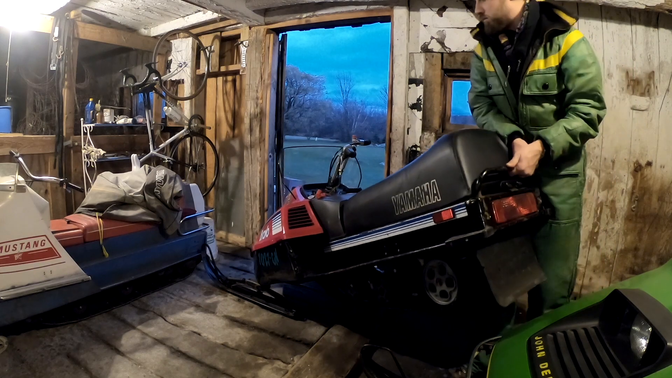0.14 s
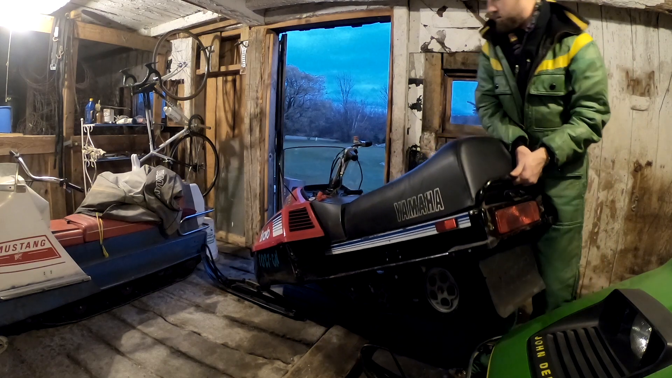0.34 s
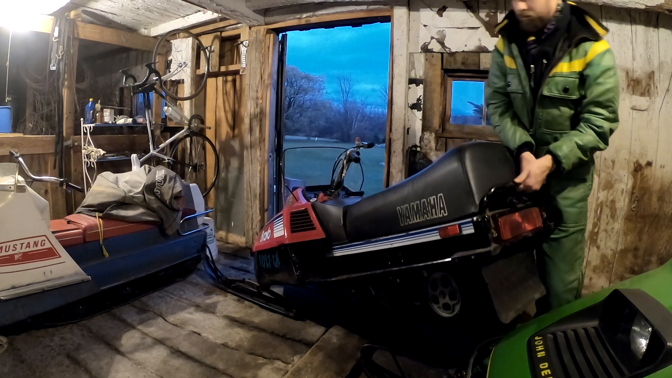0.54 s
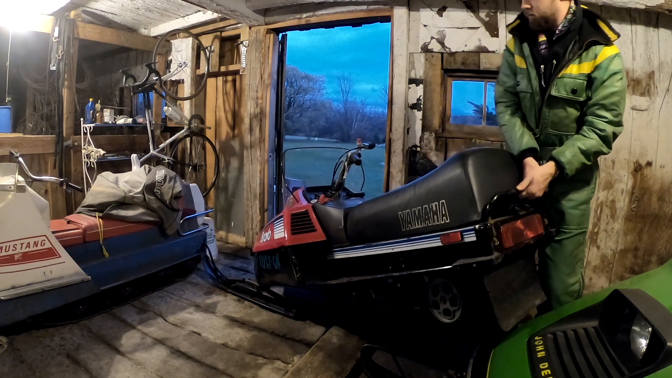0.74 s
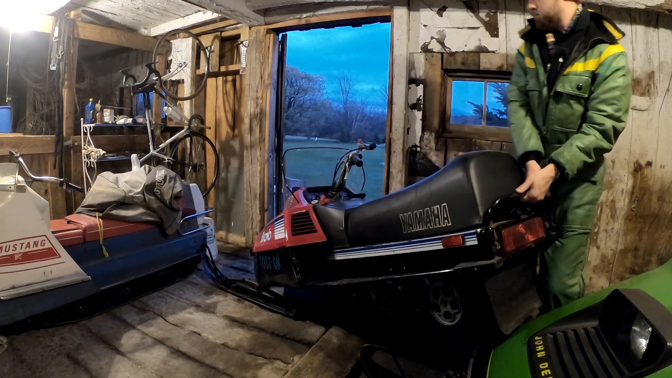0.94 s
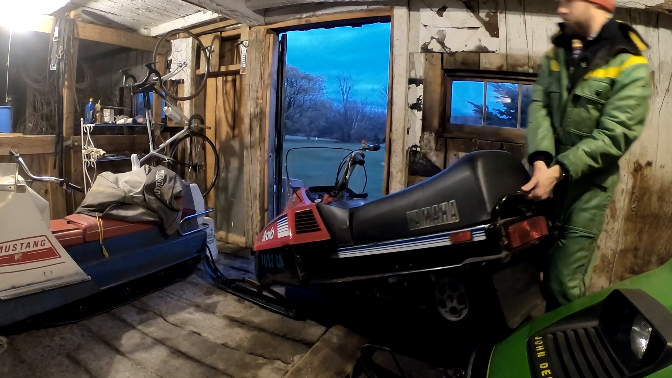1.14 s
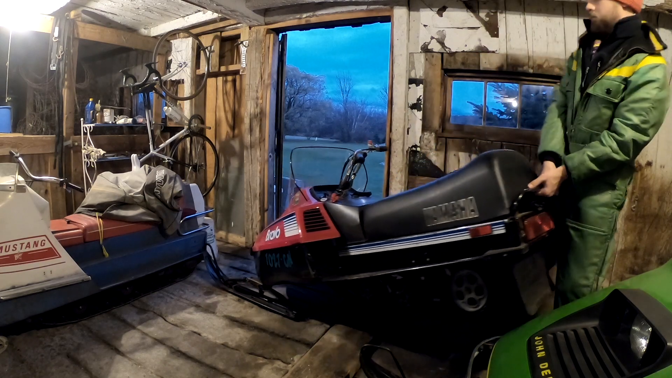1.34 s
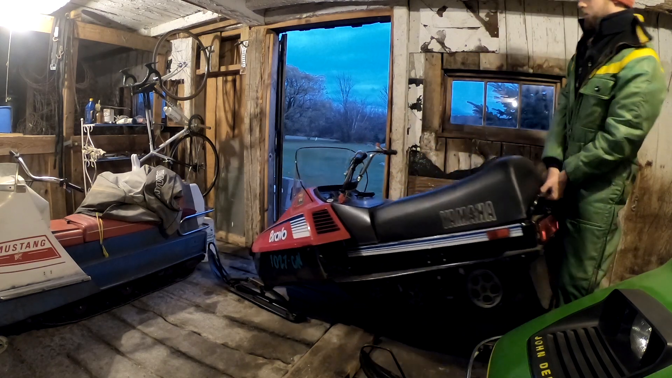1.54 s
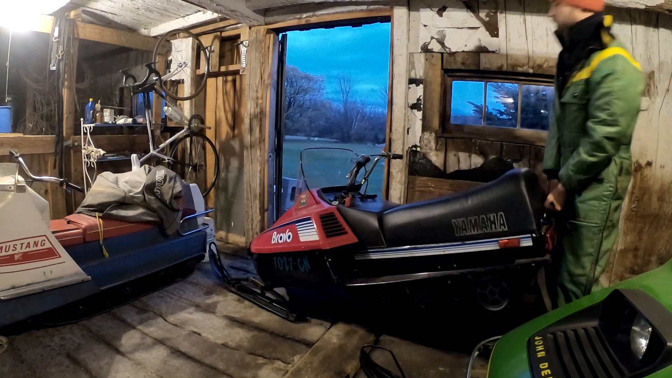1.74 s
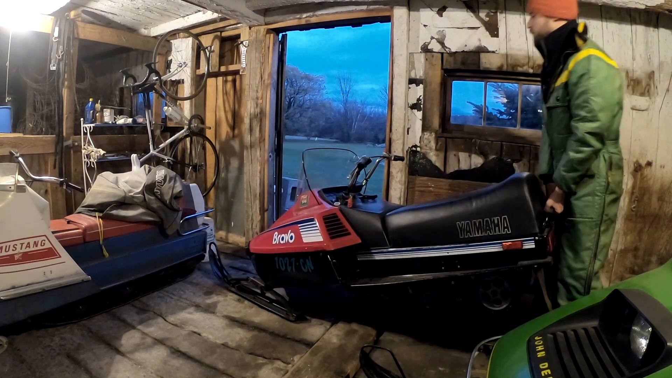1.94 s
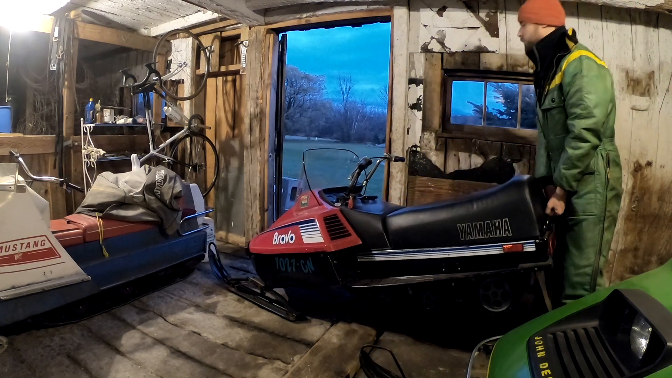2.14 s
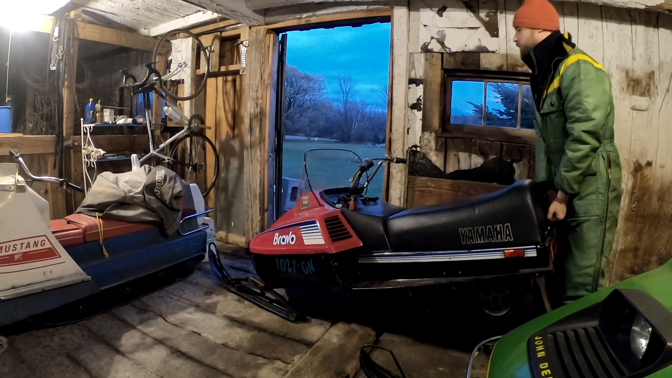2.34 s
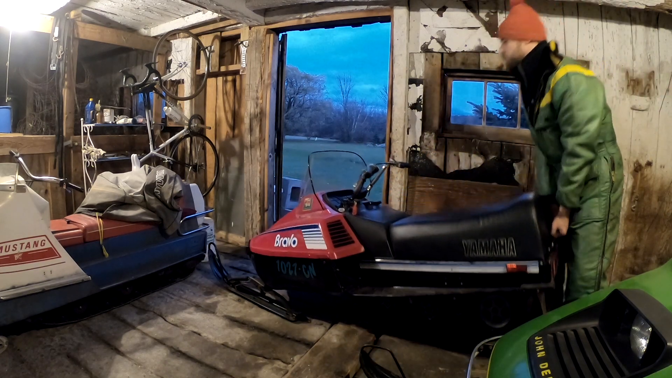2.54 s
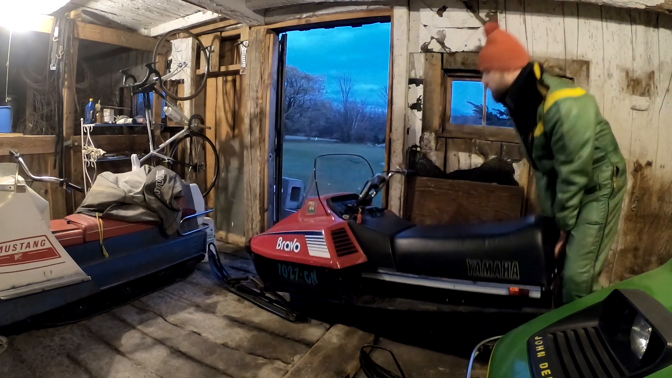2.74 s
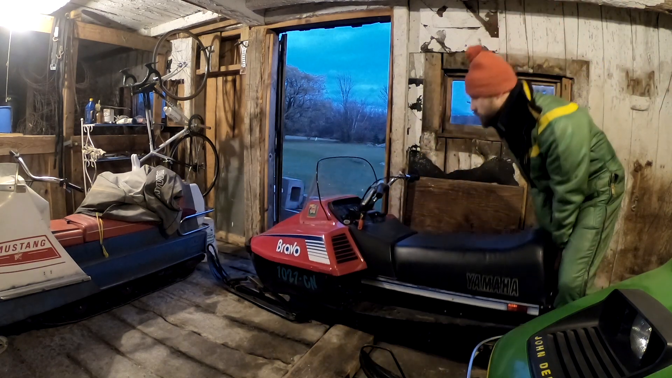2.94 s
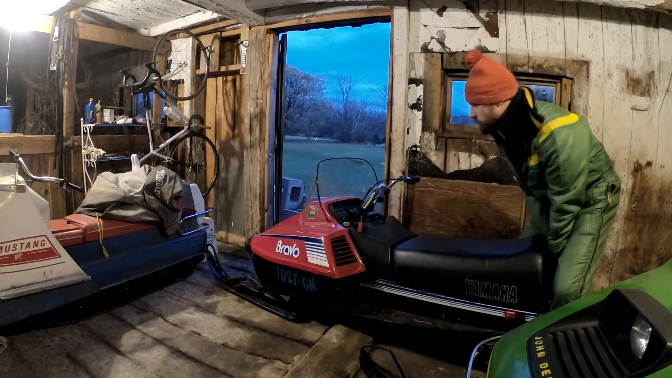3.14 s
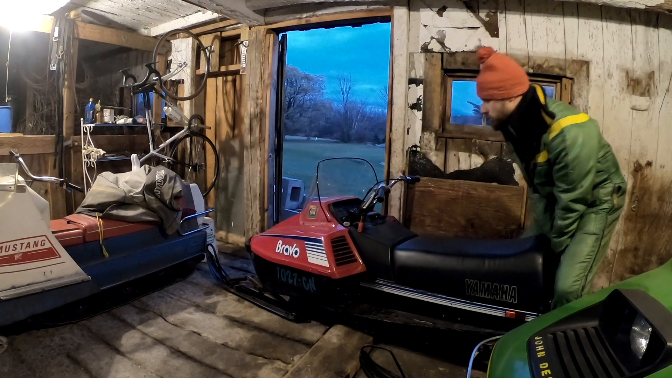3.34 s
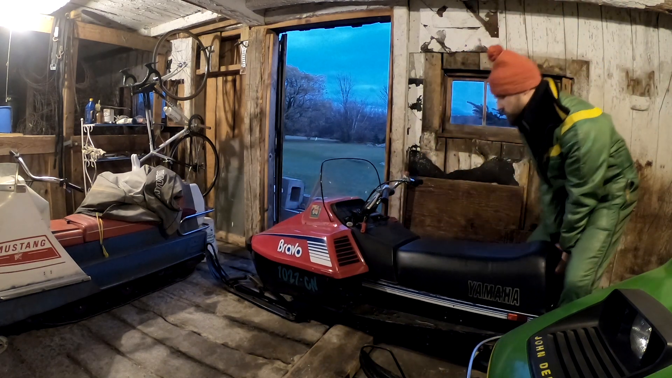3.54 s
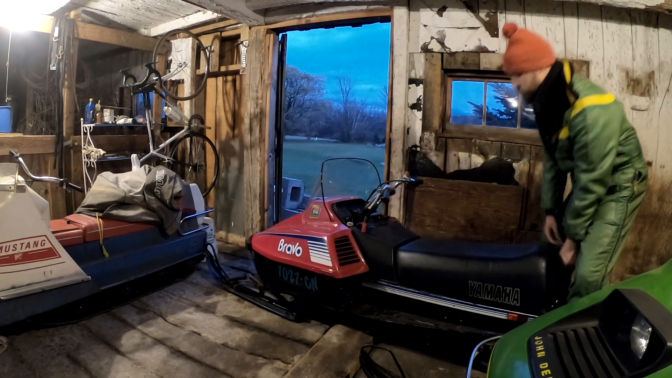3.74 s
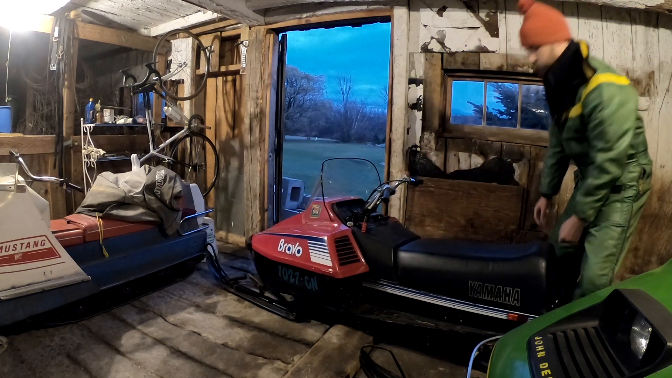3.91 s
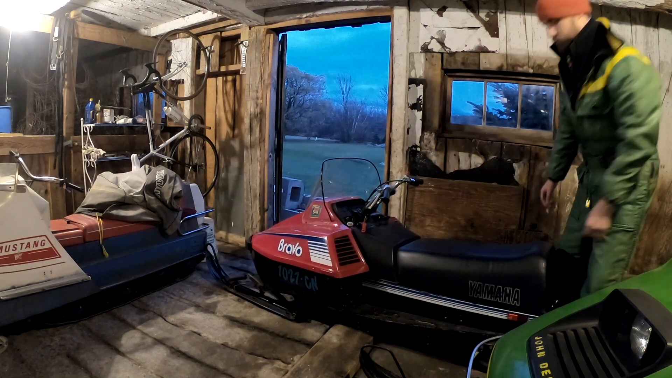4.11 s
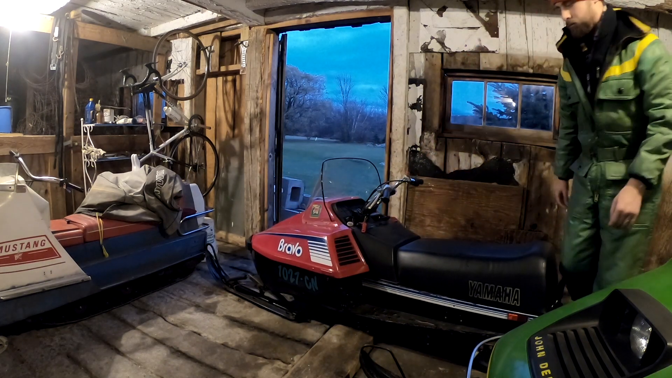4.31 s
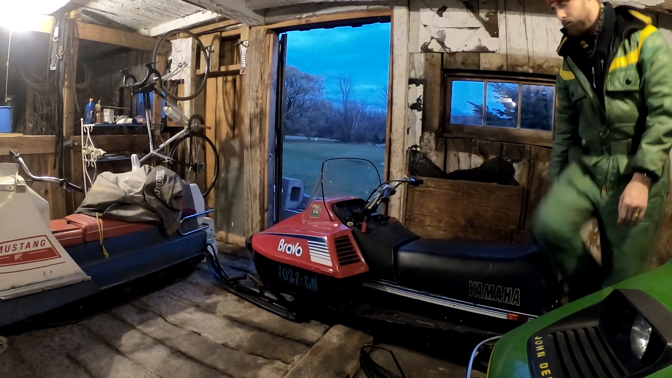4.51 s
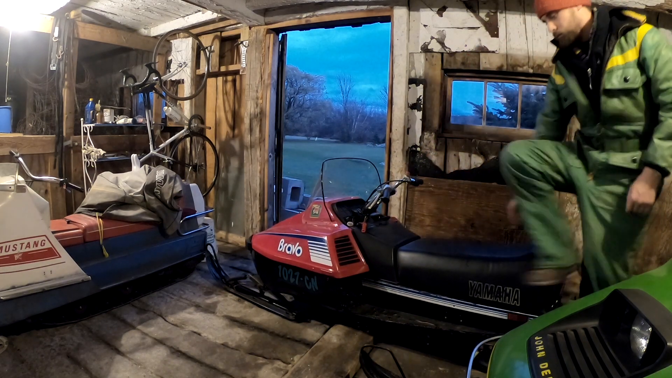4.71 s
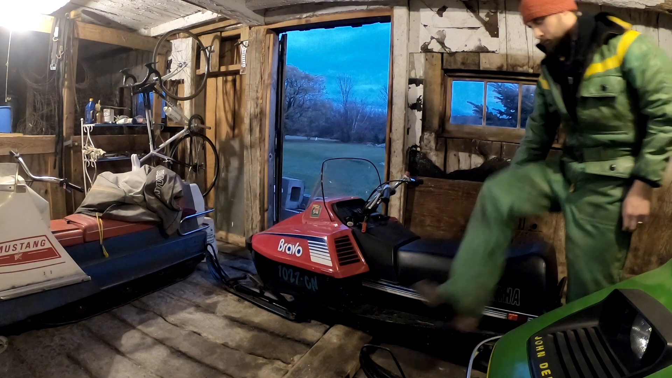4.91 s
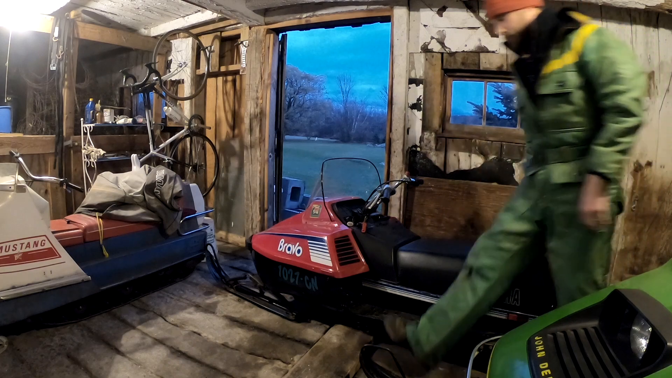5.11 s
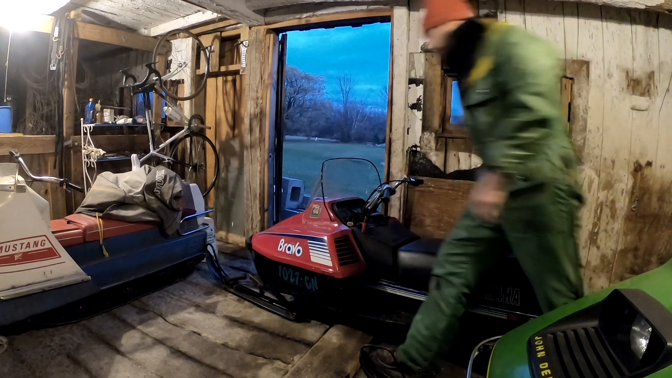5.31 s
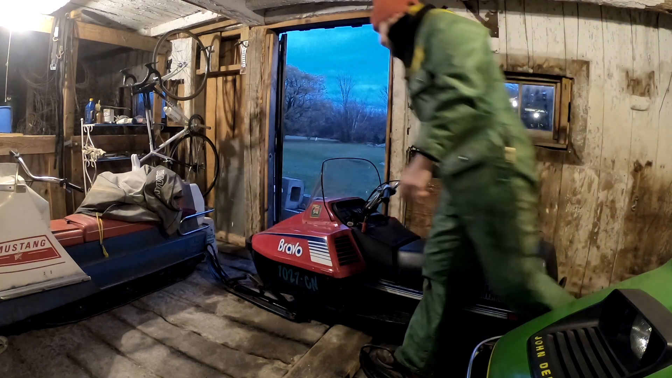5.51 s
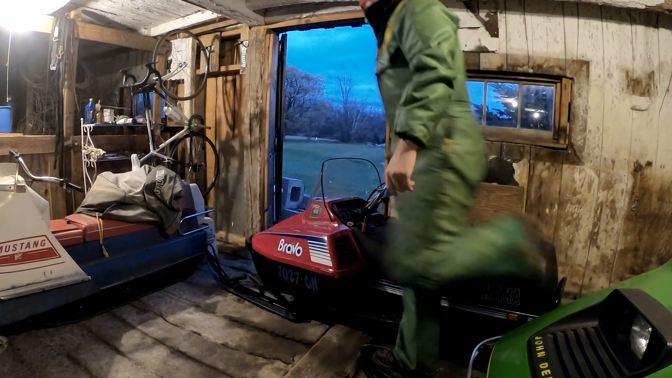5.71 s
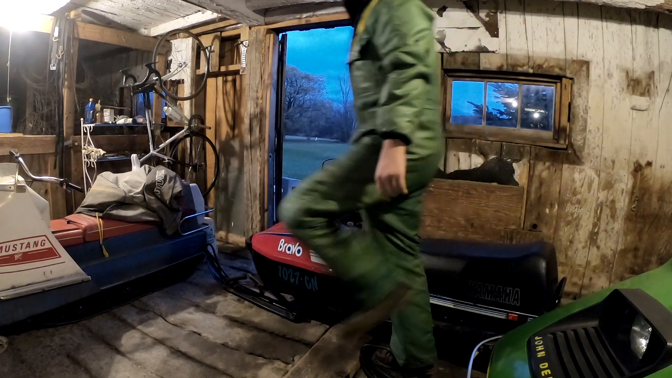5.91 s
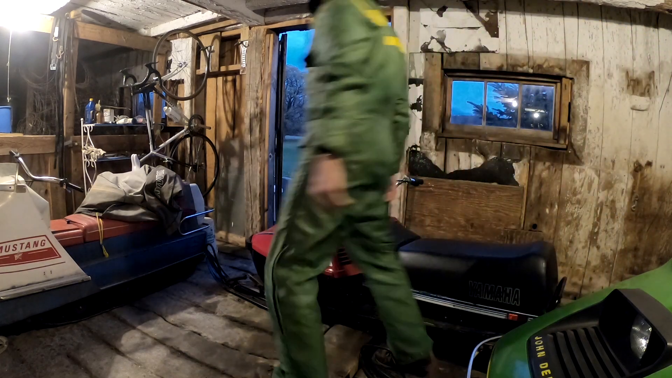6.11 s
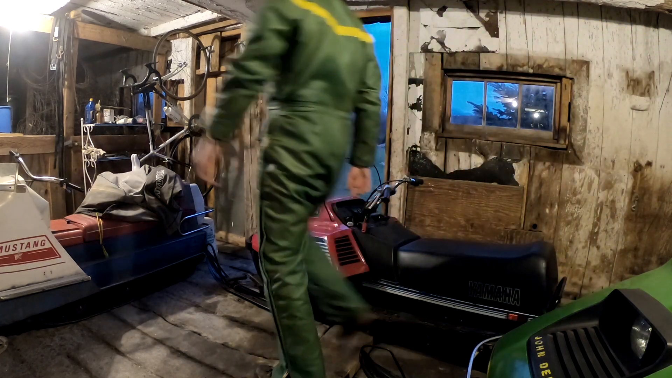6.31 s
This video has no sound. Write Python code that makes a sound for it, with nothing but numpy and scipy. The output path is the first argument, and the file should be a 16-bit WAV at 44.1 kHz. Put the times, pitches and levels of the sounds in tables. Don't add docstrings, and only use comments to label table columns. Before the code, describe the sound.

A heavy snowmobile scrapes and groans across wooden barn floorboards with knocks and squeaks, drops, then boots step, slap sharply, and land a deep thump.

```python
import sys
import numpy as np
from scipy import signal
from scipy.fft import rfft, irfft, next_fast_len
from scipy.io import wavfile

SR = 44100
rng = np.random.default_rng(int(sys.argv[2]) if len(sys.argv) > 2 else 0)


def dump(signal):
    limited = np.clip(np.atleast_2d(signal).T, -1, 1)
    pcm = np.round(limited * 32767).astype(np.int16)
    wavfile.write(sys.argv[1], SR, pcm)


def volts_from_decibels(level):
    exponent = np.asarray(level, float) / 20
    return 10 ** exponent


N = 284886

# hz, width_hz, level_db
BOARD_MODES = [(156, 18.5, -11), (182.4, 6.7, 2), (229.7, 23.7, 0.5), (269.4, 62, 1), (297.6, 46, 0.5),
               (350, 46, -6), (406, 26, -5), (485, 89, -13)]
# time_s, level_db
SLED_WEIGHT = [(0.0, -43), (0.2, -46), (0.4, -55), (0.9, -64), (1.04, -52), (1.22, -52), (1.3, -39),
               (1.66, -31), (1.9, -53), (2.0, -44), (2.34, -63), (2.97, -47), (3.12, -37), (3.26, -49),
               (3.41, -57), (3.56, -41), (4.0, -55), (4.22, -82)]
# peak_s, level_db, rise_s per 20 dB, fall_s per 20 dB
SHOVE_SWELLS = [(0.005, -42, .05, .07), (0.16, -48, .09, .2), (1.35, -36, .09, .3), (1.53, -32, .13, .12),
                (1.7, -35, .15, .2), (1.9, -62, .1, .35), (3.12, -39, .085, .13), (3.67, -46, .07, .16),
                (5.27, -55, .08, .12)]


def band(x, low_hz, high_hz):
    return signal.sosfilt(signal.butter(2, [low_hz, min(high_hz, SR / 2 - 2000)], "band", fs=SR, output="sos"), x)


def low_pass(x, cut_hz, order=2):
    return signal.sosfilt(signal.butter(order, cut_hz, fs=SR, output="sos"), x)


def high_pass(x, cut_hz, order=2):
    return signal.sosfilt(signal.butter(order, cut_hz, "high", fs=SR, output="sos"), x)


def rms_one(x):
    return x / np.sqrt(np.mean(x ** 2) + 1e-20)


def panned(pan_db):
    return volts_from_decibels(np.multiply.outer([.5, -.5], pan_db))


def place_db(s):
    # time_s, knock_pan_db, scuff_pan_db
    path = [(0.3, 1.5, -5.5), (1.3, 1.2, -1.5), (3.1, 3, 0.4), (3.3, 1.3, -4), (4.75, 5, -7),
            (5.2, 6, -1.5), (5.6, 1.2, -5), (6.2, 0.3, 0.8)]
    at_s, knock_db, scuff_db = np.transpose(path)
    return np.interp(s, at_s, knock_db), np.interp(s, at_s, scuff_db)


def curve(rows):
    return np.interp(np.arange(N) / SR, *np.transpose(rows))


def swells(rows):
    t = np.arange(0, N + 32, 32) / SR
    power = 0
    for peak_s, level_db, rise_s, fall_s in rows:
        below = np.maximum((peak_s - t) / rise_s, (t - peak_s) / fall_s)
        power = power + volts_from_decibels(2 * level_db - 40 * below)
    return np.interp(np.arange(N) / SR, t, np.sqrt(power))


def slips(per_s, uneven_db, alike, clump_db):
    sizes = volts_from_decibels(uneven_db * np.minimum(rng.exponential(1, (2, N)), 4)) * rng.standard_normal((2, N))
    knots = np.arange(0, N, 500)
    clumps = np.interp(np.arange(N), knots, rng.standard_normal(len(knots)))
    happens = rng.random((2, N)) < per_s / SR
    mid, side = rms_one(sizes * volts_from_decibels(clump_db * clumps) * happens)
    alike = np.clip(alike, 0, 1)
    return (np.sqrt(1 + alike) * mid + np.sqrt(1 - alike) * side * np.array([[1], [-1]])) / np.sqrt(2)


def body(drive, modes):
    out, power = 0, 0
    for k, (hz, width_hz, level_db) in enumerate(modes):
        r = np.exp(-np.pi * width_hz / SR)
        b = np.array([1, 0, -1]) * (1 - r * r) / 2
        a = [1, -2 * r * np.cos(2 * np.pi * hz / SR), r * r]
        out = out + (-1) ** k * volts_from_decibels(level_db) * signal.lfilter(b, a, drive + 1e-18)
        power += volts_from_decibels(2 * level_db) * np.pi * width_hz / SR
    return out / np.sqrt(power)


def blow(s, contact_ms, modes, gains):
    t = np.arange(min(SR // 2, N - round(s * SR))) / SR
    hz, level, t60_s = np.transpose(modes)
    level = level * (-1) ** np.arange(len(hz))
    rings = level[:, None] * np.sin(2 * np.pi * np.outer(hz, t)) * volts_from_decibels(-60 * t / t60_s[:, None])
    push = np.hanning(max(round(contact_ms * SR / 1000), 5))
    sound = signal.fftconvolve(gains @ rings, push[None])[:, :len(t)]
    return round(s * SR), sound / np.abs(sound.mean(axis=0)).max()


def board_force():
    # peak_s, level_db, rise_s per 20 dB, fall_s per 20 dB
    treads = [
        (2.375, -45.5, .03, .7),
        (3.6, -27, .05, .18),
        (4.57, -50, .13, .36),
        (4.78, -34, .04, .05),
        (5.21, -41, .03, .3),
        (5.27, -35, .08, .12),
        (5.59, -46, .03, .5),
        (5.92, -61, .5, 3.0),
    ]
    shoves = volts_from_decibels(-1.5) * swells(SHOVE_SWELLS)
    return np.sqrt(volts_from_decibels(2 * curve(SLED_WEIGHT)) + swells(treads) ** 2 + shoves ** 2)


def rubbing_force():
    # time_s, level_db
    slide = [(0.0, -60), (0.08, -50), (0.22, -63), (0.92, -63), (1.24, -53), (1.3, -47.5), (1.7, -50),
             (1.89, -55), (2.08, -66), (2.21, -86), (2.57, -58), (2.74, -56), (3.17, -56), (3.38, -94),
             (3.59, -48), (3.69, -60), (3.77, -57.5), (3.91, -82)]
    # time_s, level_db
    stride = [(3.95, -82), (4.22, -67), (4.44, -62.5), (4.57, -52.5), (4.73, -56), (4.78, -51), (4.92, -60),
              (5.04, -67), (5.17, -65), (5.21, -49), (5.28, -46), (5.47, -65), (5.92, -65)]
    mean_db = -58
    ski_db = curve(slide + [(4.1, -120)])
    suit_db = curve([(3.8, -120)] + stride)
    ski_hull = volts_from_decibels(-57.5 + 1.1 * (ski_db - mean_db))
    suit_hull = (suit_db > -90) * volts_from_decibels(-61 + .7 * (suit_db - mean_db))
    return ski_hull + suit_hull, volts_from_decibels(ski_db) + volts_from_decibels(suit_db)


def scuff_force():
    # start_s, grit_db, hull_db, rise_ms, t60_s
    scuffs = [(0.057, -29.5, -41, 2, 0.13), (0.088, -56, -38, 7, 0.21), (0.176, -39, -48, 3, 0.1),
              (0.9896, -41.5, -54.5, 4, 0.2), (1.31, -41, -45, 8, 0.3), (1.326, -44, -35.5, 5, .3),
              (1.372, -43, -37, 4, 0.12), (1.443, -47, -48, 4, 0.14), (1.475, -40, -52, 6, .15),
              (1.54, -46, -44, 5, .15), (1.59, -36, -38, 8, 0.2), (1.611, -24, -36, 4, 0.1),
              (1.64, -38, -39, 12, .45), (1.8942, -40.5, -53.5, 4, 0.31), (2.991, -46.5, -42, 8, 0.15),
              (3.094, -47.5, -50, 8, 0.085), (3.19, -41, -42, 3, 0.15), (3.445, -54, -48, 1.5, 0.4),
              (3.545, -50, -46, 15, .3), (3.578, -42, -33, 8, 0.23), (3.612, -28, -28, 8, 0.17),
              (3.818, -45, -47, 20, 0.39), (4.49, -45, -52.5, 30, 0.43), (4.762, -43.5, -39, 8, 0.17),
              (5.074, -49, -59, 8, 0.48), (5.1966, -5.5, -26.5, 2.5, 0.07), (5.21, -20, -35, 5, .3),
              (5.255, -30.5, -35, 8, 0.2), (5.577, -35.5, -54, 8, 0.31), (5.8696, -52, -60, 10, 0.48),
              (5.94, -38, -45, 20, 0.16), (6.145, -53, -38, 1.5, 0.15), (6.1894, -48, -48, 6, 0.16),
              (6.2344, -52, -49.5, 6, 0.16)]
    hull, grit, t = np.zeros((2, N)), np.zeros((2, N)), np.arange(SR // 2) / SR
    for s, grit_db, hull_db, rise_ms, t60_s in scuffs:
        at, rise_s = round(s * SR), rise_ms / 1000
        shape = (1 - np.exp(-t / max(rise_s, 5e-4))) * volts_from_decibels(-60 * t / max(t60_s, .03))
        shape = np.outer(panned(place_db(s)[1]), shape / shape.max())[:, :N - at]
        hull[:, at:at + len(t)] += volts_from_decibels(hull_db - 3.0) * shape
        grit[:, at:at + len(t)] += volts_from_decibels(grit_db - 7.5) * shape
    return hull, grit


def drag():
    # hz, width_hz, level_db
    joist_modes = [(30.2, 5.1, -21), (58, 22, -5), (84, 9, -1), (113, 7.3, -3)]
    hull_modes = [(663, 100, -2), (804, 135, -2.5), (970, 135, -3), (1159, 46.5, 0.5), (1301, 86, -1.5),
                  (1500, 172, -1.5), (1814, 277, -4)]
    grit_modes = [(1992, 290, -0.5), (2400, 290, 2), (2780, 257, 0.5), (3050, 173, 3), (3440, 630, -2.5),
                  (4170, 340, -2), (4580, 440, -4), (5520, 420, -2), (6200, 540, -2), (7080, 340, -3.5),
                  (7685, 230, -5.5)]
    # peak_s, level_db, rise_s per 20 dB, fall_s per 20 dB
    settle = [
        (6.27, -26, .06, .2),
    ]
    suit_from_s, suit_sheen_db = 4.2, 9
    place = panned(-2.5)[:, None]
    hull_rub, grit_rub = rubbing_force()
    hull_scuff, grit_scuff = scuff_force()

    joist_force = volts_from_decibels(-78) + swells(SHOVE_SWELLS + settle)
    joist_slips = slips(600, uneven_db=3.5, alike=0.2, clump_db=0.5)
    joists = low_pass(body(volts_from_decibels(1.5) * joist_force * joist_slips, joist_modes), 220)

    board_slips = slips(600, uneven_db=1.5, alike=0.85, clump_db=2.0)
    boards = band(body(volts_from_decibels(2.5) * board_force() * place * board_slips, BOARD_MODES), 118, 563)

    hull_force = volts_from_decibels(1.5) * hull_rub * place + hull_scuff
    hull = body(hull_force * slips(1500, uneven_db=1.5, alike=0.4, clump_db=1.5), hull_modes)

    grit_force = volts_from_decibels(5.5) * grit_rub * place + grit_scuff
    grains = grit_force * slips(9000, uneven_db=-1.5, alike=0.52, clump_db=1.0)
    grit = band(body(grains, grit_modes), 1550, 7900)

    suit_gain = volts_from_decibels(suit_sheen_db * (np.arange(N) > suit_from_s * SR))
    fine = grit_force * suit_gain * rng.standard_normal((2, N))
    sheen = volts_from_decibels(-22) * band(fine, 8000, 10400) + volts_from_decibels(-33) * band(fine, 8600, 14000)
    return joists + boards + hull + grit + sheen


def groan():
    # peak_s, level_db, rise_s per 20 dB, fall_s per 20 dB
    groans = [(0.1, -36, .06, .08), (.215, -33, .03, .2), (0.25, -30, .1, .3), (.32, -33, .2, .05),
              (0.49, -51, .08, .15), (1.05, -47, .04, .5), (1.49, -30, .12, .15), (1.69, -25.5, .1, .09),
              (1.86, -42, .2, .07), (1.99, -43, .04, .4), (2.91, -41, .1, .1), (2.42, -41, .05, .3),
              (0.83, -55, .2, .2), (3.48, -40, .13, .2), (3.636, -24, .05, .03), (4.0, -52, .3, .2)]
    # start_s, end_s
    free_spans = [
        (0.0, 3.03),
        (3.28, 4.16),
    ]
    plank_hz, sag_hz_per_db, loaded_db = 157, .7, -38
    t, out = np.arange(N) / SR, 0
    waver = rms_one(low_pass(rng.standard_normal((3, N)), 22))
    force = np.hypot(volts_from_decibels(-8 + curve(SLED_WEIGHT)), swells(groans))
    hz = plank_hz + sag_hz_per_db * np.clip(loaded_db - 20 * np.log10(force), 0, 40)
    phase = 2 * np.pi * np.cumsum(hz * (1 + 0.075 * waver[0])) / SR
    ear_phase = np.outer([1, -1], 0.37 + .15 * waver[2])
    for start_s, end_s in free_spans:
        fade = np.clip(np.minimum(t - start_s + .02, end_s + .02 - t) / .02, 0, 1)
        level = fade * force * volts_from_decibels(2.5 * waver[1] - 2.0) * np.sqrt(2)
        out = out + level * np.sin(phase + ear_phase)
    return band(out, 118, 260) * panned(0.6)[:, None]


def squeaks():
    # start_s, level_db, pitch_hz, length_s
    narrow = [(0.076, -42, 1300, 0.045), (1.364, -33, 1194, 0.025), (1.435, -29.5, 1115, 0.038),
              (1.584, -26.5, 1184, 0.056), (1.646, -32, 1090, 0.078), (3.0, -37, 1220, 0.039),
              (3.092, -34.5, 1330, 0.024), (3.131, -34.5, 1270, 0.033), (3.443, -39, 1940, 0.044),
              (3.585, -25, 420, 0.1), (3.592, -29.5, 790, .1), (3.835, -43.5, 1180, 0.035),
              (4.495, -44.5, 293, 0.24), (4.53, -45, 2950, 0.055), (4.722, -46, 1300, 0.045),
              (4.6, -48, 3500, .045), (4.5, -50, 1450, .05), (5.195, -33.5, 573, 0.083),
              (5.578, -45, 2530, 0.047), (5.592, -47, 770, .07), (5.31, -42, 1750, .06),
              (3.19, -36, 2450, .03), (3.205, -38, 1500, .03), (3.14, -38, 1500, .03),
              (1.33, -36, 1900, .03), (1.37, -38, 2100, .03)]
    # start_s, level_db, pitch_hz, length_s
    broad = [(0.084, -42.5, 2000, 0.08), (1.889, -43, 1330, 0.18), (3.188, -38, 2400, .045),
             (4.266, -53.5, 4460, 0.12), (5.193, -24, 3200, 0.018), (5.583, -37, 6100, 0.037),
             (5.943, -41.5, 5800, 0.039), (6.186, -22, 467, 0.068), (6.19, -42, 1100, 0.068),
             (1.62, -33, 520, .12), (2.995, -35, 450, .06), (3.6, -30, 650, .09), (5.22, -35, 2050, .07),
             (5.335, -43, 6200, .07), (2.995, -46, 2750, .02), (1.612, -34, 3700, .015)]
    out, grain = np.zeros((2, N)), slips(3000, uneven_db=1.0, alike=0.59, clump_db=0.0)
    t = np.arange(SR // 4) / SR
    for rows, width_share in [(narrow, .155), (broad, .48)]:
        for s, peak_db, hz, length_s in rows:
            at, width_hz = round(s * SR), width_share * hz
            shape = (1 - np.exp(-t / .003)) * np.exp(-(t / length_s) ** 3)
            ring = body(shape * grain[:, at:at + len(t)], [(hz, width_hz, 0)])
            ring = body(ring, [(hz, 1.86 * width_hz, 0)])
            held_rms = np.sqrt(np.mean(ring ** 2) * 0.61 / length_s)
            out[:, at:at + len(t)] += volts_from_decibels(peak_db) * ring / held_rms / 2
    return band(out, 60, 8500)


def knocks():
    # start_s, peak_db, pitch_hz, t60_s
    blows = [(0.085, -23.5, 156, 0.066), (0.134, -31.5, 173, 0.07), (0.38, -36, 233, 0.068),
             (1.337, -18, 174, 0.075), (1.373, -18.5, 120, 0.2), (1.459, -24, 156, 0.09),
             (1.484, -21.5, 121, 0.2), (1.644, -20.5, 167, 0.12), (1.682, -14, 156, 0.046),
             (2.361, -33.5, 209, 0.11), (3.005, -24, 200, 0.091), (3.057, -23, 160, 0.064),
             (3.083, -17.5, 185, 0.062), (3.103, -16.5, 155, 0.047), (3.129, -21, 142, 0.14),
             (3.167, -20.5, 160, 0.082), (3.193, -25.5, 156, 0.06), (3.242, -28.5, 157, 0.072),
             (3.587, -26.5, 247, 0.09), (3.622, -13.5, 157, 0.09), (3.824, -28, 163.4, 0.09),
             (4.764, -34.5, 235, 0.11), (5.212, -31.5, 218, 0.076), (5.245, -25, 184, 0.09),
             (5.264, -26.5, 198, 0.11), (5.351, -33, 192, 0.068), (5.582, -31.5, 247, 0.16),
             (5.968, -34.5, 211, 0.063), (6.189, -7, 350, .04), (6.19, -14.5, 520, .06),
             (6.21, -16, 480, .05), (6.227, -19, 520, .05), (6.194, -12, 270, .05),
             (6.238, -13.5, 240, .09), (6.266, -20, 140, .06), (5.292, -30, 300, .06),
             (1.63, -27, 430, .06), (1.725, -28, 480, .06), (1.765, -28, 330, .06), (3.03, -32, 380, .06)]
    out, chance = np.zeros((2, N)), rng.standard_normal((len(blows), 3, len(BOARD_MODES)))
    for (s, peak_db, own_hz, t60_s), (both, *ears) in zip(blows, chance):
        modes = [(hz, volts_from_decibels(level_db - 16 + 2.4 * c), 1.3 * t60_s)
                 for (hz, width_hz, level_db), c in zip(BOARD_MODES, both)]
        gains = np.c_[1 + .6 * np.array(ears), [1, 1]]
        at, sound = blow(s, 1.94, modes + [(own_hz, 1, t60_s)], gains)
        out[:, at:at + sound.shape[1]] += volts_from_decibels(peak_db - 2.0) * sound * panned(place_db(s)[0])[:, None]
    return high_pass(out, 125, 4)


def slap():
    # hz, level_db, t60_s
    panel = [(955, -7, 0.25), (1390, -10, .15), (2030, -5, 0.3), (2650, -3, .15), (2890, -3, .2),
             (3040, -2, 0.12), (3450, -6, 0.15), (3750, -8, .1), (4620, -7, 0.15), (5920, -6, 0.2),
             (6135, -7, 0.3), (6860, -5, 0.2), (7770, -12, .15)]
    trim = [(2525, -3, .1), (3354, -12, .15), (4430, -10, .15), (4963, -12, .15), (5690, -6, .15),
            (5916, -4, .2), (6300, -6, .15), (7084, -8, .15), (7590, -12, .15)]
    # late_s, level_db
    bounces = [
        (0.0, 0.0),
        (.005, -1.5),
        (.024, -9),
        (.072, -12),
    ]
    # start_s, peak_db
    ticks = [
        (5.578, -40),
        (5.588, -36),
        (5.596, -36),
        (5.962, -44),
    ]
    out, slap_s, slap_db = np.zeros((2, N)), 5.199, -22
    hits = [(slap_s + late_s, slap_db + level_db, panel) for late_s, level_db in bounces]
    hits += [(s, peak_db, trim) for s, peak_db in ticks]
    for s, peak_db, table in hits:
        modes = [(hz, volts_from_decibels(level_db + 2.0 * rng.standard_normal()), t60_s) for hz, level_db, t60_s in table]
        at, sound = blow(s, .12, modes, 1 + 0.3 * rng.standard_normal((2, len(table))))
        out[:, at:at + sound.shape[1]] += volts_from_decibels(peak_db) * sound
    return out


def thump():
    # start_s, peak_db, contact_ms, joists_against_boards_db
    stages = [
        (6.148, -24.5, 0.49, -3),
        (6.178, -18.5, 0.87, -5),
        (6.19, -14, 1.12, -3),
        (6.197, -4.5, 1.2, -15),
        (6.212, -18, 1.1, -9),
        (6.237, -17, 1.03, 10),
        (6.266, -13, 2.2, 11),
        (6.309, -22, 3.9, 14),
        (6.348, -33, 1.8, -2),
    ]
    # hz, level_db, t60_s
    floor_modes = [(28.3, -23, 0.44), (58.5, -4, 0.55), (90.5, -7.5, 0.36), (156, 10.5, 0.09),
                   (236, 0, 0.12), (266, 4.5, .12), (335, -7.5, 0.054), (74.7, -3, 0.32), (388, -2.5, 0.11),
                   (426, -6.5, 0.096), (491, -2, 0.085), (518, -2, 0.043), (580, -24, 0.077),
                   (676, -21, 0.036), (790, -12.5, 0.033), (916, -10.5, 0.061), (1157, -11, 0.082),
                   (1400, -21, .09)]
    is_joist = np.array(floor_modes)[:, 0] < 120
    out, chance = np.zeros((2, N)), rng.standard_normal((len(stages), 3, len(floor_modes)))
    for (s, peak_db, contact_ms, joist_db), (both, *ears) in zip(stages, chance):
        modes = [(hz, volts_from_decibels(level_db + 2 * c + joist_db * (hz < 120)), t60_s)
                 for (hz, level_db, t60_s), c in zip(floor_modes, both)]
        gains = [[1.02], [.98]] + np.where(is_joist, .8, .36) * ears
        at, sound = blow(s, contact_ms, modes, gains)
        out[:, at:at + sound.shape[1]] += volts_from_decibels(peak_db - 2) * sound
    return out


def barn(x):
    t60_s, wall_cut_hz = 0.31, 1720
    size = next_fast_len(N + SR)
    w = 2 * np.pi * np.arange(size // 2 + 1) / size
    dull = np.exp(-2 * np.pi * wall_cut_hz / SR)
    wall = np.sqrt((1 - dull) / (1 - dull * np.exp(-1j * w)))
    lags = (rng.uniform(.013, .045, (2, 8)) * SR).astype(int)
    walls = np.zeros((2, len(w)), complex)
    for (side, k), lag in np.ndenumerate(lags):
        loop = volts_from_decibels(-60 * lag / SR / t60_s) * wall * np.exp(-1j * w * lag)
        walls[side] += (-1) ** k * loop / (1 - loop)
    return irfft(rfft(x.mean(axis=0), size) * walls, size)[:, :N]


def air():
    # hz, level_db per Hz
    spectrum = [(13, -36), (22, 10.5), (96, -23), (145, 3), (201, 2.5), (567, -13.5), (724, -11),
                (3250, -25), (4770, -28), (5930, -20.5), (7580, -33.5), (8450, -42.5), (12400, -41.5),
                (15000, -54)]
    hz = np.fft.rfftfreq(N, 1 / SR) + 1
    at_hz, level_db = np.transpose(spectrum)
    shape = volts_from_decibels(np.interp(np.log(hz), np.log(at_hz), level_db))
    return volts_from_decibels(-57.5 - 0.5) * rms_one(irfft(rfft(rng.standard_normal((2, N))) * shape, N))


def scene():
    floor = drag() + groan() + squeaks() + knocks() + slap() + thump()
    return floor + volts_from_decibels(-10.5) * band(barn(floor), 96, 11000) + air()


def top_cut(x):
    return signal.sosfilt(signal.butter(12, 15610, fs=SR, output="sos"), x)


def record(dry):
    bass, treble = band(dry, 22, 91), band(dry, 4200, 8200)
    x = dry + np.array([[1], [-1]]) * (0.09 * bass + 0.19 * treble)
    x = high_pass(x, 30)
    x = .55 * np.tanh(x / .55)
    return top_cut(low_pass(x, 14800, 8))


dry = scene()
out = record(dry)
dump(out)
```